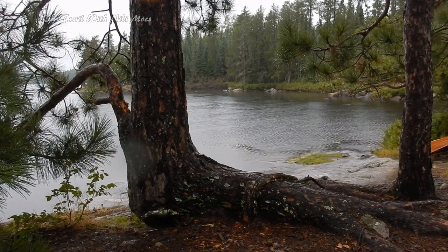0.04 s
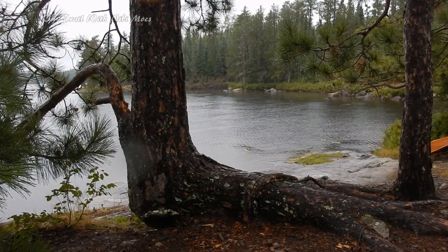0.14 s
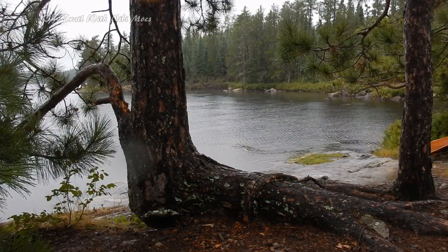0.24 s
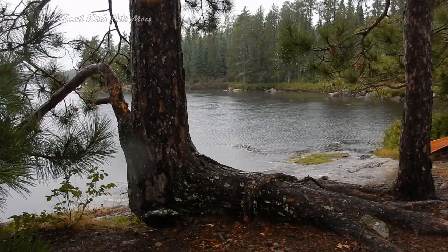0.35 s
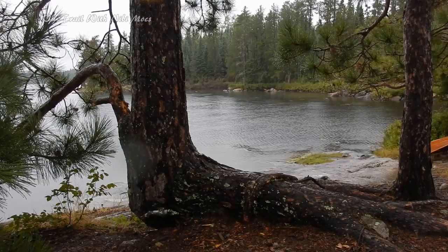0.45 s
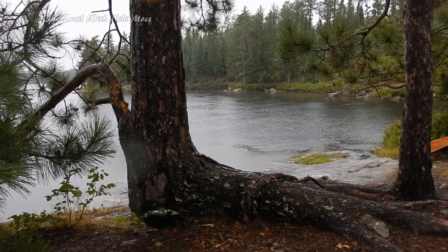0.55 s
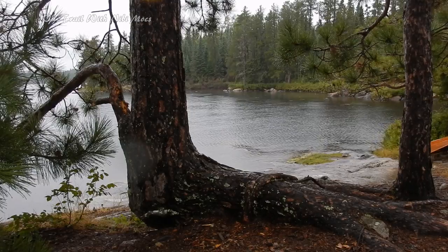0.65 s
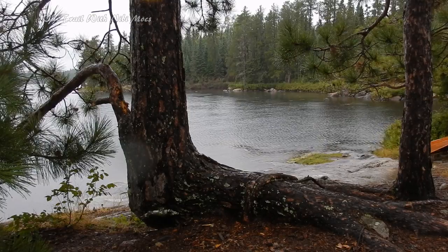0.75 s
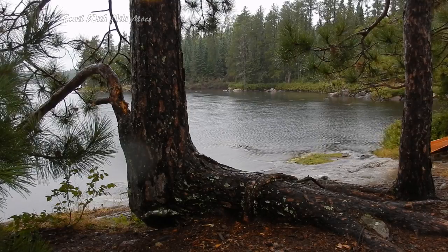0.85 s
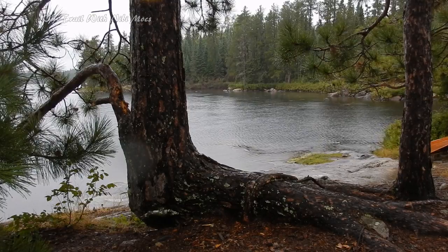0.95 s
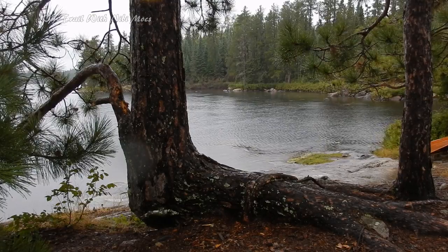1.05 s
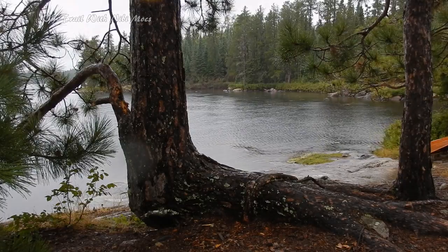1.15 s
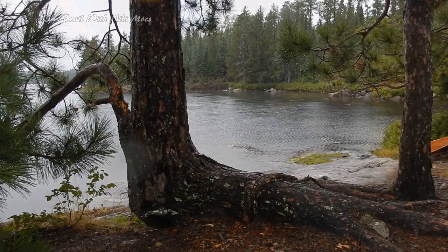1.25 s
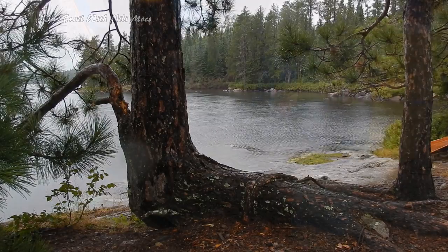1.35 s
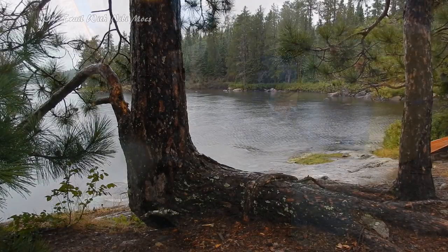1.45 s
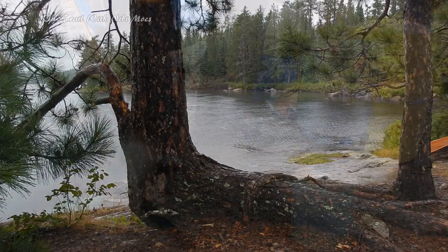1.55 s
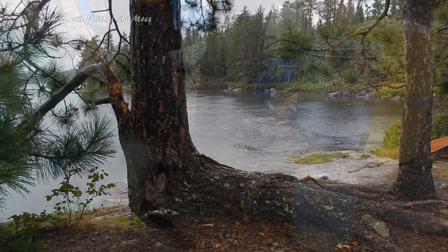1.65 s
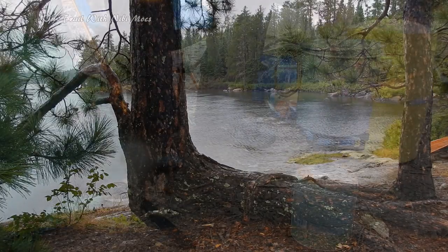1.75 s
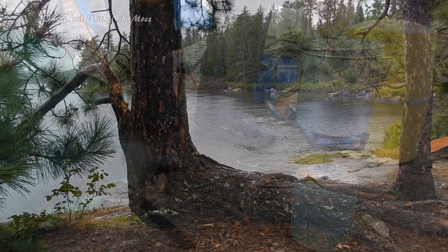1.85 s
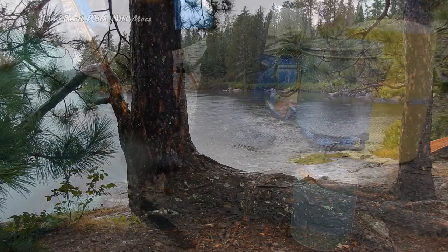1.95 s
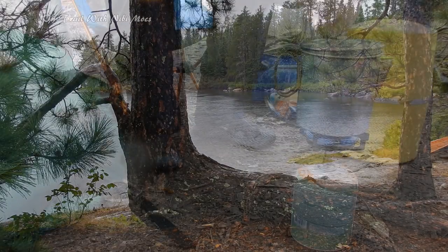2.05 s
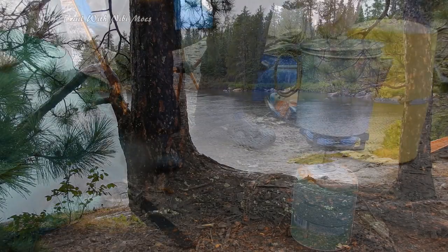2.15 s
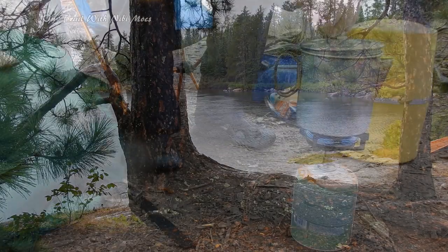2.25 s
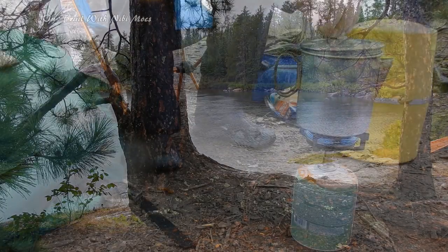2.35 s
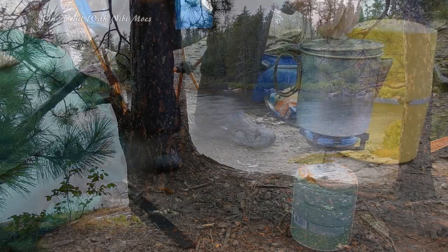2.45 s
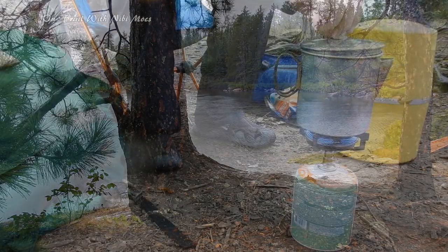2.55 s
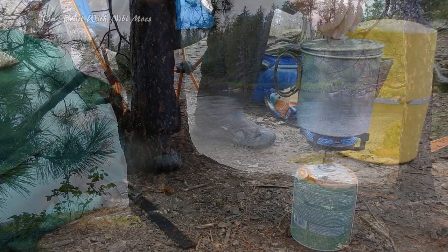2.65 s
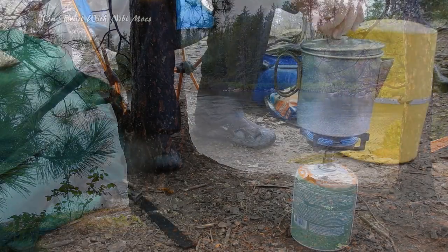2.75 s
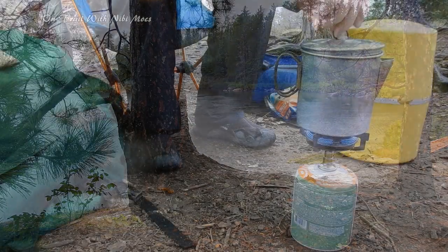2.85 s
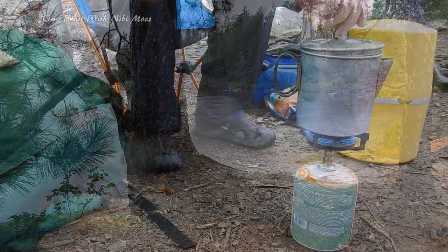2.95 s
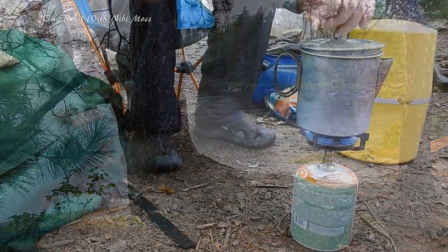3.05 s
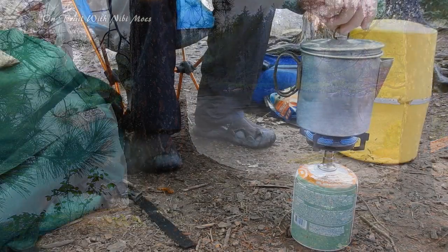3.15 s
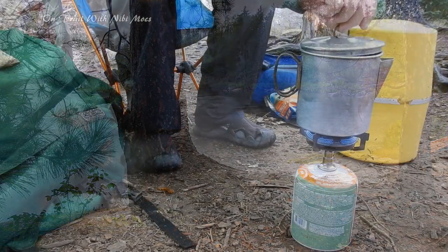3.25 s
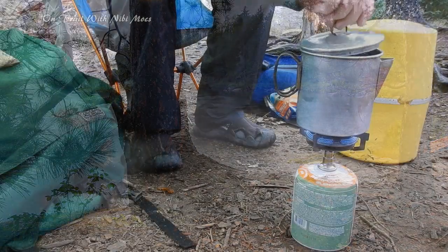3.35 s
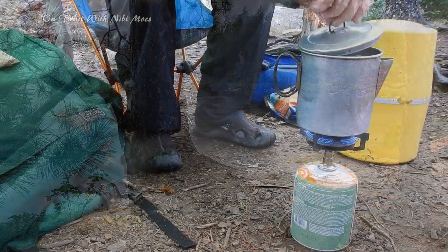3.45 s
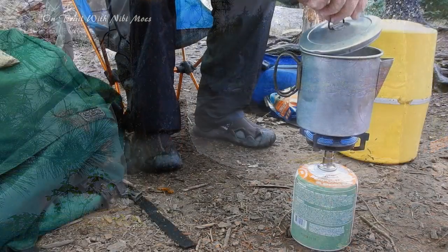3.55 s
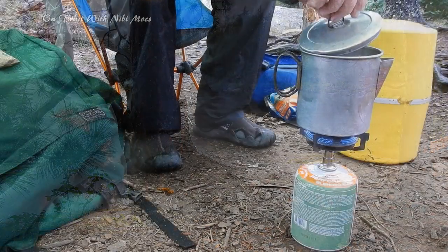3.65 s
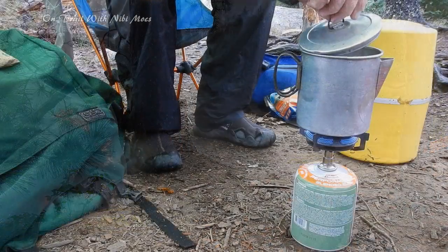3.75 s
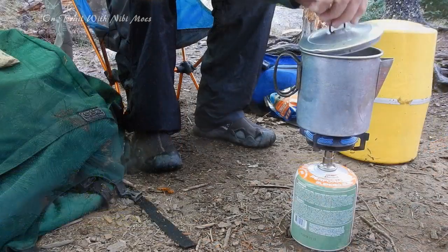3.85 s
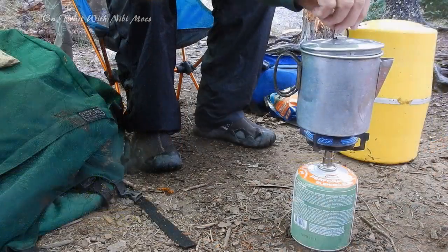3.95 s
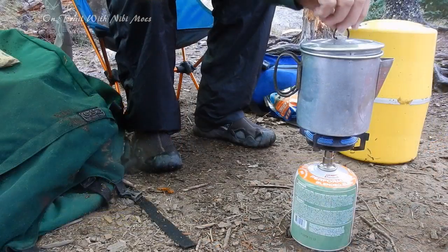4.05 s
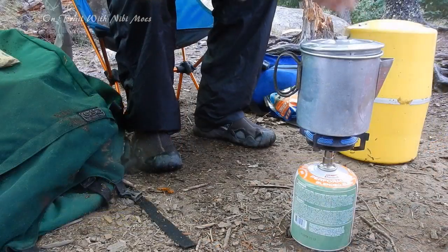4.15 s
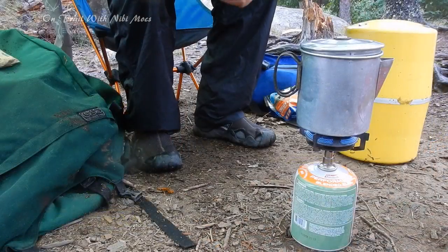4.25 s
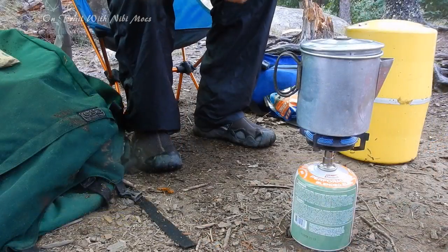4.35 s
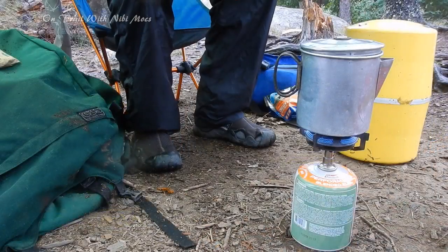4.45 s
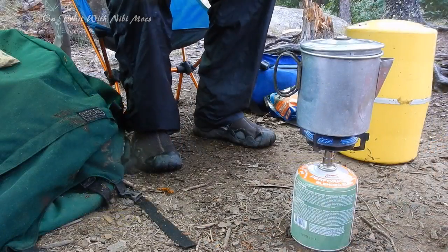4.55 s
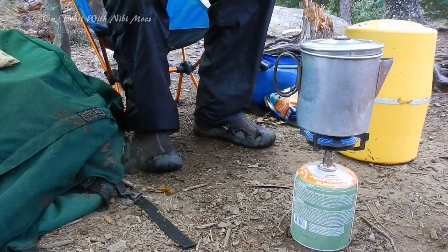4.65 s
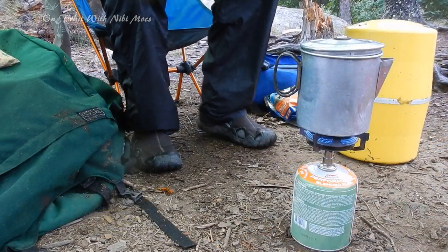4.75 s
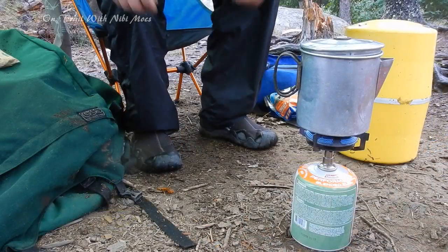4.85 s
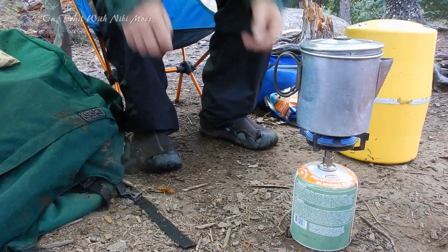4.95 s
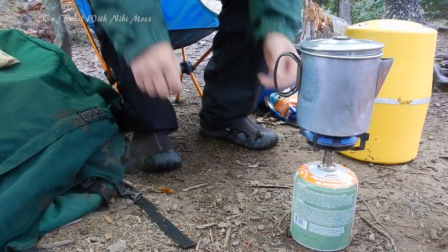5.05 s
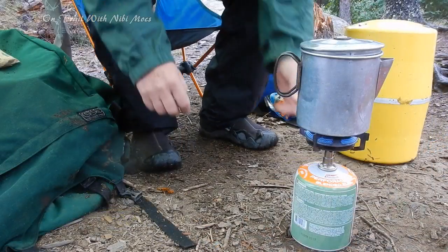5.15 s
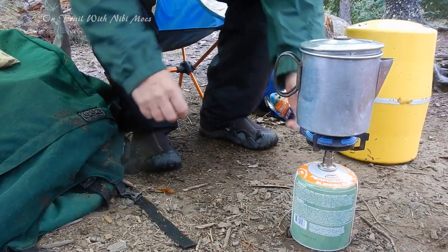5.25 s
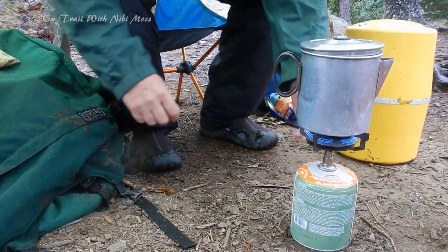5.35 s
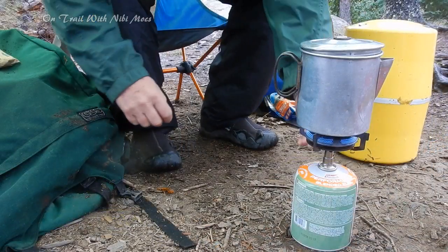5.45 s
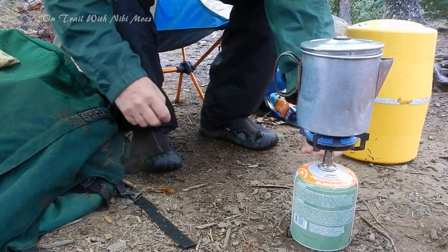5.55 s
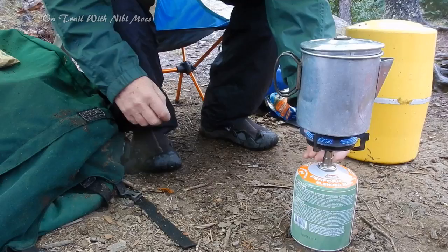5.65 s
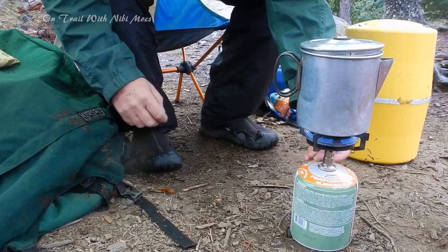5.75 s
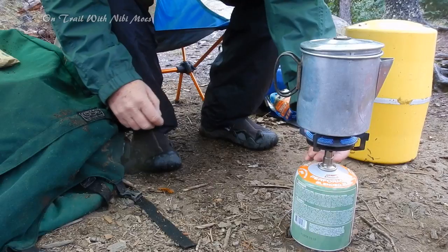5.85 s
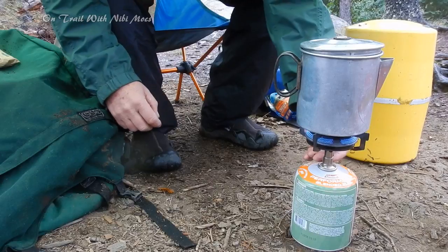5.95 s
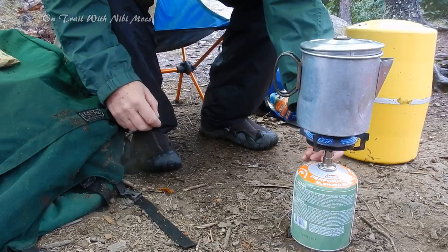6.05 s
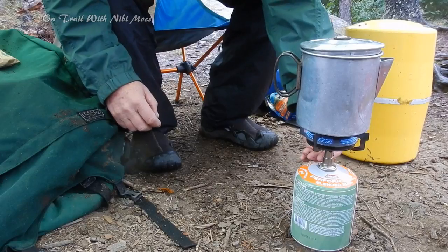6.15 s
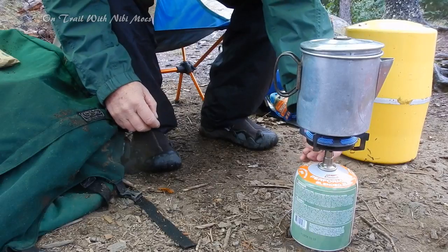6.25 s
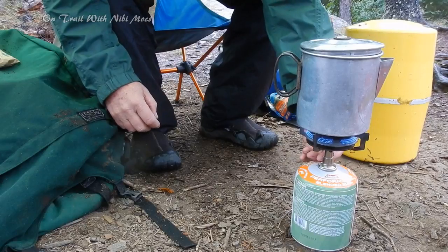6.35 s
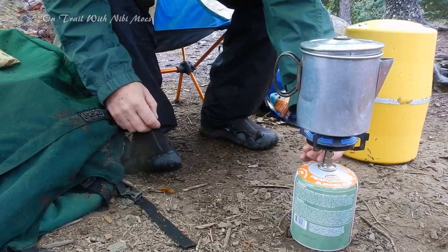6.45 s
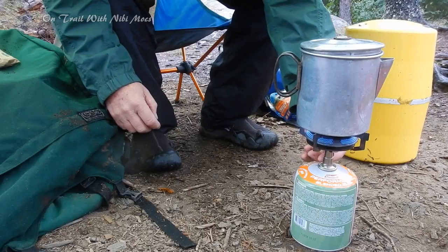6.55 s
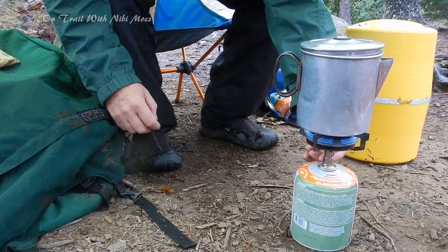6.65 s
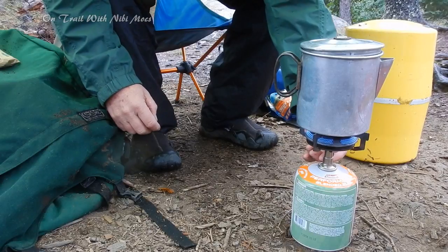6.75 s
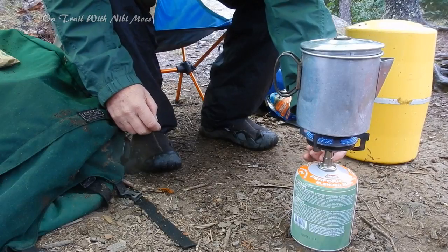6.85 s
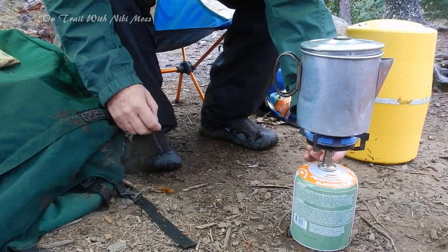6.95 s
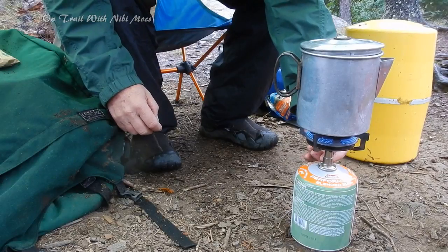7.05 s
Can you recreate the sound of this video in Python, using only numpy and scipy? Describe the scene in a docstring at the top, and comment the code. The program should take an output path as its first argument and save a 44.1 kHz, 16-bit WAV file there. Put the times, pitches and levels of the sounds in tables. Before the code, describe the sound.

Quiet lakeside drizzle cuts abruptly to a steadily roaring, hissing gas stove, with raindrops patting a tarp and a metal pot lid clinking.

```python
"""Light rain falls by a lake, with ticks on leaves and a few faint pats on a tarp.
After about a second comes a hard cut to a gas stove roaring under a pot, with more drops on the tarp.
A hand lifts the pot's lid, then slides it and sets it down; the last clink trips the gain control.
Later the treble swells, the valve squeaks and the flame sinks a little. Wind buffets throughout.
Filtered noise makes rain, burner and wind; fading sine tones make the ring of lid and cloth."""
import sys
import numpy as np
from scipy import signal
from scipy.fft import rfft, irfft, next_fast_len
from scipy.io import wavfile
from scipy.ndimage import uniform_filter1d, minimum_filter1d

SR = 44100
rng = np.random.default_rng(int(sys.argv[2]) if len(sys.argv) > 2 else 0)


def transcribe(u):
    """Save the signal u as a 16-bit wav file named by the first command-line argument.

    u: samples, shape (n,) or (channels, n), limited to [-1, 1]; the rate is SR.
    q: integer samples, one column per channel.
    """
    v = np.clip(np.atleast_2d(u).T, -1, 1)
    q = np.round(v * 32767).astype(np.int16)
    wavfile.write(sys.argv[1], SR, q)


N = 312733  # length in samples
CUT_S = 1.098  # the shore gives way to the stove here


def gain_of(db):
    """Turns decibels into a factor."""
    return 10 ** (np.asarray(db) / 20)


def evened(x):
    """Scales a sound to an rms (average strength) of 1."""
    return x / np.sqrt(np.mean(x ** 2) + 1e-20)


def read(points, hz):
    """Reads a table of frequencies and values, joined by straight lines over log frequency."""
    f, value = np.transpose(points)
    return np.interp(np.log(hz + 1), np.log(f + 1), value)


def add(mix, s, sound):
    """Lays a sound into the mix at s seconds."""
    part = mix[:, round(s * SR):][:, :sound.shape[1]]
    part += sound[:, :part.shape[1]]


def curve(rows):
    """Joins rows of seconds and values by straight lines, one value a sample."""
    s, value = np.transpose(rows)
    return np.interp(np.arange(N) / SR, s, value)


def sides(left_db):
    """Left and right gains that make the left louder by left_db."""
    return gain_of([[left_db / 2], [-left_db / 2]])


def fall(t, t60):
    """A fade that loses 60 dB in t60 seconds."""
    return gain_of(-60 * t / t60)


def coloured(x, points):
    """Minimum-phase filter: it shapes the spectrum but keeps the sharp front of a click."""
    log_gain = np.log(gain_of(read(points, abs(np.fft.fftfreq(2048, 1 / SR)))))
    spectrum = np.exp(log_gain - 1j * signal.hilbert(log_gain).imag)
    taps = np.fft.ifft(spectrum).real[:1024]
    taps = taps[None] / np.linalg.norm(taps)
    return signal.oaconvolve(x, taps, axes=1)[:, :x.shape[1]]


# How the two microphone ports differ for wide sounds.
# Each row: frequency in Hz, likeness of the two sides (1 is the same).
PORT_LIKENESS = [(60, 0.25), (110, 1), (200, 0.98), (380, 0.99), (700, 0.97), (1290, 0.9), (2380, 0.86),
                 (4400, 0.8), (8120, 0.75), (15000, 0.61)]
# Each row: frequency in Hz, left over right in dB.
PORT_LEFT_DB = [(60, -1), (110, -0.5), (200, -1), (380, -0.5), (700, -2.5), (1290, -1.5), (2380, -2),
                (4400, -2.5), (8120, 3.5), (15000, 3)]
# Each row: frequency in Hz, how far the left is ahead of the right in radians.
PORT_LEAD = [(0, -0.44), (2760, 0.31), (4570, 0.59), (5170, 1.15), (6120, 0.29), (7240, 1.7), (7580, 0.98),
             (8010, 0.64), (8790, 0.038), (9820, -0.52), (10600, -0.36), (11600, 0.3), (12400, 0.0),
             (16000, 0.1)]


def noise(points, patchy_db, flutter_db, stretch=None, size=512, count=N):
    """Two-sided noise from random short spectra, with drifting patches and a shared flutter of level."""
    hop = size // 3
    frames, hz = count // hop + 5, np.fft.rfftfreq(size, 1 / SR)
    a, b, c, d, patches = rng.standard_normal((frames, len(hz), 5), dtype=np.float32).T
    patches = evened(uniform_filter1d(uniform_filter1d(patches, size=5, axis=0), size=12, axis=1))
    flutter = evened(uniform_filter1d(rng.standard_normal(frames), size=5))
    # stretch slides the whole spectrum up or down in pitch
    shift = 1 if stretch is None else stretch[np.minimum(np.arange(frames) * hop, N - 1)]

    same = np.clip(read(PORT_LIKENESS, hz), -1, 1)[:, None]
    left = a + 1j * b
    right = same * left + np.sqrt(1 - same ** 2) * (c + 1j * d)
    right = right * np.exp(-1j * read(PORT_LEAD, hz))[:, None]
    port_gains = gain_of(np.outer([.5, -.5], read(PORT_LEFT_DB, hz)))[:, :, None]
    level_db = read(points, hz[:, None] / shift) + patchy_db * patches + flutter_db * flutter
    spectra = np.array([left, right]) * port_gains * gain_of(level_db)
    sound = evened(signal.istft(spectra, nperseg=size, noverlap=size - hop)[1][:, :count])
    return np.pad(sound, ((0, 0), (0, N - count)))


# Colours of the flame's rumble, the gas jet's hiss and the fizz above it.
# Each row: frequency in Hz, relative level in dB per Hz.
FLAME_COLOUR = [(35, -52), (60, -12.5), (173, 1.5), (256, -5), (597, -10.5), (725, -18.5), (806, -23),
                (1150, -17), (1320, -21), (1610, -16.5), (2170, -17.5), (2500, -27), (3320, -15),
                (3750, -28.5), (4100, -28.5), (5330, -66), (9020, -120)]
JET_COLOUR = [(2290, -55), (3900, -36), (4320, -20.5), (4680, -8.5), (5020, -7), (5460, -3.5), (5850, 3),
              (6070, 0), (6720, -9), (7270, -29.5), (8000, -41.5), (10400, -63), (17600, -120)]
FIZZ_COLOUR = [(4120, -27), (7000, 1), (7280, -8), (7730, -12), (8470, -9), (9320, -15), (10400, -11),
               (11000, -24.5), (11700, -53), (14700, -35), (16300, -48)]
FLAME_DB, JET_DB, FIZZ_DB = -35.5, -36.5, -55.5  # before the changes below
TURN_DOWN_S, TURN_DOWN_DB_PER_S = 6.23, -2  # the valve is slowly closed a little from here
JET_WARMS_DB_PER_S = 0.31  # the jet grows slightly as the stove runs
JET_TABLE_HZ = 5900  # the pitch at which the jet's colour is drawn
JET_PITCH_HZ, JET_WANDER = 5857, 0.002  # the pitch wanders by this share (rms)
SWELL_S, SWELL_WIDTH_S, SWELL_DB = 5.41, 0.17, 5  # the treble swells once
SWELL_JET_SHARE = 0.42  # the jet takes this share of the swell


def stove():
    """The flame rumbles under the pot, the gas jet hisses round one pitch and fizzes above it."""
    t = np.arange(N) / SR
    closing_db = TURN_DOWN_DB_PER_S * np.maximum(t - TURN_DOWN_S, 0)
    swell_db = SWELL_DB * np.exp(-((t - SWELL_S) / SWELL_WIDTH_S) ** 2)
    rates_hz = np.geomspace(.5, 6, num=8)
    wander = evened(sum(np.sin(2 * np.pi * (f * t + rng.random())) for f in rates_hz))
    jet_hz = JET_PITCH_HZ * (1 + JET_WANDER * wander)
    warming_db = JET_WARMS_DB_PER_S * (t - N / SR / 2)  # zero halfway through
    jet_db = JET_DB + warming_db + closing_db + SWELL_JET_SHARE * swell_db
    flame = gain_of(FLAME_DB + closing_db) * noise(FLAME_COLOUR, 0.99, 0.98, size=1024)
    jet = gain_of(jet_db) * noise(JET_COLOUR, 1.17, 0.82, stretch=jet_hz / JET_TABLE_HZ)
    fizz = gain_of(FIZZ_DB + closing_db + swell_db) * noise(FIZZ_COLOUR, 1.0, 0.53)
    return flame + jet + fizz + squeak()


SQUEAK_START_S, SQUEAK_END_S, SQUEAK_DB = 5.535, 5.63, -34.5  # level before the fade in and out
SQUEAK_FIRST_HZ, SQUEAK_LAST_HZ, SQUEAK_WIDTH_HZ = 6603, 6150, 706


def squeak():
    """Gas whistles briefly through the turning valve: a narrow band of noise that slides down."""
    n, out = round((SQUEAK_END_S - SQUEAK_START_S) * SR), np.zeros((2, N))
    low_pass = signal.butter(N=4, Wn=SQUEAK_WIDTH_HZ / SR, output="sos")
    slow = signal.sosfilt(low_pass, rng.standard_normal((2, n)).T @ [1, 1j])
    pitch_hz = np.linspace(SQUEAK_FIRST_HZ, SQUEAK_LAST_HZ, n)
    tone = (slow * np.exp(2j * np.pi * np.cumsum(pitch_hz) / SR)).real
    add(out, SQUEAK_START_S, gain_of(SQUEAK_DB) * evened(tone) * np.hanning(n) * np.ones((2, 1)))
    return out


# The tones (modes) in which the lid rings when nothing damps it.
# Each row: pitch in Hz, level in dB, seconds to fade by 60 dB, share that belongs to the rim (0 to 1).
LID_MODES = [(626, -20, 0.033, 0.92), (827, -10.5, 0.044, 0.34), (972, -0.5, 0.021, 0.12),
             (1167, -3, 0.034, 0.14), (1320, -2.5, 0.022, 0.27), (1460, -24, 0.25, 0),
             (1540, -10, 0.061, 0.26), (1930, -13.5, 0.12, 0), (2082, -3, 0.031, 0), (2844, -16.5, 0.27, 0),
             (3470, -13, 0.034, 0.23), (4290, -12.5, 0.1, 0), (4320, -9, 0.09, 0.54),
             (4358, -6.5, 0.06, 0.59), (4823, -0.5, 0.058, 0.0062), (4865, -25, 0.084, 0.44),
             (4950, -3, 0.045, 0), (5110, -11, 0.17, 0.21), (5140, -2.5, 0.095, 0), (5460, -13, .03, 0.42),
             (5350, -11, 0.11, 0.54), (5900, -7, 0.084, 0.47), (6750, -9, 0.034, 0.26),
             (7300, -33, .05, 0.38), (7740, -13, 0.081, 1), (8300, -30, .04, 0), (9400, -28.5, 0.084, 0.97),
             (10200, -40, .04, 0)]
RIM_LEFT_DB = 7  # a pure rim tone is this much louder on the left


def lid_modes():
    """The metal lid's fading sine tones, returned with their pitches and rim shares."""
    t = np.arange(SR // 4) / SR
    hz, db, t60, rim = np.transpose(LID_MODES)[:, :, None]
    # the phase difference between the ports, as a delay of the right one
    lag = np.array([0, 1])[:, None, None] * read(PORT_LEAD, hz) / (2 * np.pi * hz)
    modes = gain_of(db) * fall(t, t60) * np.sin(2 * np.pi * hz * (t - lag))
    modes = modes * np.minimum(t / 0.00024, 1)  # soft start
    return hz, rim, modes * gain_of(RIM_LEFT_DB * rim * [[[.5]], [[-.5]]])


# Blows on the lid.
# Each row: start in seconds, strength in dB, hardness in dB per octave (more favours high tones),
# rattle fade time in seconds, extra rim level in dB, clatter level in dB against the strength,
# seconds in which the gripping fingers alone would fade the ring by 60 dB.
LID_BLOWS = [(3.4569, -15, -0.5, 0.0057, 3.5, -11, 0.072), (3.4655, -21, -0.5, 0.012, 2, -2.5, 0.065),
             (3.503, -31, -4.5, .003, -8, -9, 0.043), (4.0248, -16.5, -1, 0.0067, 17.5, 1, 0.29),
             (4.035, -18.5, 5.5, 0.0049, 5, -9, 0.22), (4.2537, -2.5, 7.5, 0.0036, -21, -6.5, 3.1)]
# Colour of the clatter. Each row: frequency in Hz, relative level in dB.
CLATTER_COLOUR = [(200, -19), (500, -5.5), (1500, 6), (3300, -9.5), (5000, -1.5), (7000, -17),
                  (10500, -28.5), (12000, -54), (14500, -49), (16500, -60)]


def lid_blows():
    """Each blow is a short rattle of contacts that rings the modes, with a burst of clatter."""
    out, t = np.zeros((2, N)), np.arange(SR // 4) / SR
    hz, rim, modes = lid_modes()
    signs = (-1) ** np.arange(len(LID_MODES))[:, None]
    for s, strength_db, hardness_db, rattle_s, rim_db, clatter_db, grip_t60 in LID_BLOWS:
        contacts = rng.standard_normal(2000) * (rng.random(2000) < .01)
        contacts = contacts * np.exp(-t[:2000] / rattle_s) * .5
        contacts[0] = 1
        contacts = contacts / np.linalg.norm(contacts)
        contacts = np.convolve(contacts, np.hanning(7) / 3)  # a contact lasts a moment
        share = signs * gain_of(hardness_db * np.log2(hz / 3000) + rim * rim_db)
        body = (share * modes).sum(1) * fall(t, grip_t60)
        add(out, s, gain_of(strength_db) * signal.oaconvolve(body, contacts[None], axes=1))

        loose = rng.standard_normal((3, len(t)))  # countless small modes blur into a short noise
        loose = loose[0] + 0.37 * loose[1:]
        loose = loose * (fall(t, 0.0072) + 0.61 * fall(t, 0.069 + 2 * rattle_s))
        tilted = [(f, level_db + hardness_db * np.log2(f / 3000)) for f, level_db in CLATTER_COLOUR]
        add(out, s, gain_of(strength_db + clatter_db) * coloured(loose, tilted))
    return out


SCRAPE_START_S, SCRAPE_END_S, SCRAPE_DB = 3.96, 4.025, -61.5


def lid_scrape():
    """The lid slides to its seat: growing random slips ring its modes, mostly those of the rim."""
    out = np.zeros((2, N))
    hz, rim, modes = lid_modes()
    n = round((SCRAPE_END_S - SCRAPE_START_S) * SR)
    slips = np.convolve(rng.standard_normal(n) * np.linspace(0, 1, n), np.hanning(9) / 3)
    share_db = 20.0 * rim - 5.1 * abs(np.log2(hz / 1400)) - 2.0 * np.log2(hz / 3000)
    slide = (gain_of(share_db) * modes).sum(1)
    add(out, SCRAPE_START_S, gain_of(SCRAPE_DB) * signal.oaconvolve(slide, slips[None], axes=1))
    return out


# Drops on the tarp; DELAY_S is added to each time.
# Each row: time in seconds, level in dB, pitch of the cloth in Hz, splash against the pat in dB.
TARP_DROPS = [(0.22, -34.5, 514, -5.5), (0.279, -32.5, 566, -8), (0.322, -35.5, 953, -8),
              (1.364, -26, 414, -3.5), (1.565, -19, 501, -7), (1.659, -12, 416, -5.5),
              (1.716, -19.5, 991, -6), (1.869, -27.5, 576, -2), (1.995, -17, 554, -5),
              (2.01, -22.5, 653, -2.5), (2.1, -20, 450, -3.5), (2.13, -22.5, 1080, -4),
              (2.201, -17.5, 525, -3.5), (2.256, -22, 986, -6), (2.842, -18.5, 480, -6),
              (2.868, -17.5, 470, -3), (2.908, -25, 452, -3.5), (2.991, -24, 490, -3.5),
              (3.167, -21, 367, -3), (3.332, -15, 580, -7), (3.559, -22, 424, -1.5),
              (3.859, -26, 480, -3.5), (4.602, -32.5, 444, 1), (4.668, -27, 514, -4), (4.68, -33, 487, 3),
              (4.942, -24, 641, -5), (5.344, -27.5, 586, 2.5), (5.597, -24, 400, -3),
              (5.831, -26.5, 552, -3.5), (6.062, -25, 390, -5), (6.31, -18.5, 493, -4.5),
              (6.35, -22, 410, -4.5), (6.404, -15.5, 423, -4.5), (6.466, -27.5, 395, -4),
              (6.69, -19.5, 623, -6.5), (6.725, -26.5, 401, -3), (6.899, -26, 436, -5),
              (7.013, -26.5, 390, -5.5)]
# Tones of the taut cloth. Each row: multiple of its pitch, level in dB, share of the fade time.
CLOTH_TONES = [(1, -1.3, 0.95), (1.6, -10, 0.33), (2.3, -11.5, 0.67), (3.6, -20, 0.3)]
# Colour of the splashes. Each row: frequency in Hz, relative level in dB.
SPLASH_COLOUR = [(200, -24.5), (600, 5), (2000, 2.5), (4000, -10), (5500, 4), (7000, -16.5), (10500, -39.5),
                 (12000, -58), (16000, -45)]
TARP_T60 = 0.022  # seconds for the cloth to fade by 60 dB
TARP_LEFT_DB, TARP_SPREAD_DB = -.6, 1.1  # drops land all over the cloth: mean and spread of the side
SNAP_DB, SNAP_S = -0.5, 0.00024  # the first contact of a drop, against its splash
DELAY_S = .0018  # pat, snap and splash all start this long after the time in the table
PATTER_DB, PATTER_PER_S = -53, 70  # small drops; level before the splash colour


def tarp():
    """Each drop thumps the taut cloth and splashes; many small ones patter at random."""
    pats, splashes, t = np.zeros((2, N)), np.zeros((2, N)), np.arange(2600) / SR
    fade = fall(t, TARP_T60) * np.minimum(t / 0.00063, 1)
    splash_fade = fade ** 0.64 + 0.27 * fade ** 21.0  # a slow part and a quick one
    for s, db, hz, splash_db in TARP_DROPS:
        s += DELAY_S
        left_db = TARP_LEFT_DB + TARP_SPREAD_DB * rng.standard_normal()
        level = gain_of(db) * sides(left_db)
        thump = sum(gain_of(part_db) * np.sin(2 * np.pi * k * hz * t) * fade ** (1 / share)
                    for k, part_db, share in CLOTH_TONES)
        add(pats, s, -level * thump)
        add(splashes, s, level * gain_of(splash_db + SNAP_DB) * -np.exp(-t / SNAP_S))
        spray = rng.standard_normal((3, 2600))
        spray = spray[0] + 0.26 * spray[1:]
        add(splashes, s, level * gain_of(splash_db) * spray * splash_fade)

    small = gain_of(5.8 * np.minimum(rng.exponential(1, N), 2.8)) * (rng.random(N) < PATTER_PER_S / SR)
    patter = signal.oaconvolve(small, fall(t, 0.017))[:N] * rng.standard_normal(N)
    patter = gain_of(PATTER_DB) * evened(patter) * (np.arange(N) > CUT_S * SR)
    return pats + coloured(splashes + patter, SPLASH_COLOUR)


# How loud the far rain is on the shore. Each row: time in seconds, level in dB.
RAIN_LEVEL = [(0, -51.5), (.3, -46.5), (.65, -50), (1.1, -51)]
# Colour of the rain. Each row: frequency in Hz, relative level in dB per Hz.
RAIN_COLOUR = [(53, -41), (90, 0.5), (290, -6), (376, -13), (488, -6.5), (647, -11), (1790, -12),
               (2480, -19), (2830, -19), (3830, -27), (5300, -17), (7170, -28), (8350, -40.5), (14700, -53),
               (16000, -57)]
DRIZZLE_DB, DRIZZLE_PER_S = -5.5, 170  # small near drops: level against the far rain


def shore_rain():
    """Fine rain: a steady far noise, and near drops as brief bursts of the same colour."""
    count, t = round(1.2 * SR), np.arange(500) / SR
    far = noise(RAIN_COLOUR, 1.1, 0.95, count=count)
    sizes = gain_of(5.4 * np.minimum(rng.exponential(1, count), 3))
    sizes = sizes * (rng.random(count) < DRIZZLE_PER_S / SR)
    spray = rng.standard_normal((3, count))
    near = (spray[0] + 0.81 * spray[1:]) * signal.oaconvolve(sizes, fall(t, 0.018))[:count]
    near = np.pad(evened(coloured(near, RAIN_COLOUR)), ((0, 0), (0, N - count)))
    return gain_of(curve(RAIN_LEVEL)) * (far + gain_of(DRIZZLE_DB) * near)


# Drops ticking on leaves by the shore.
# Each row: start in seconds, level in dB before the leaf colour, left over right in dB.
LEAF_TICKS = [(.125, -36.5, -12), (0.137, -36.5, 2), (0.2207, -38, -5), (.5062, -45, -8),
              (0.554, -33.5, -1.5), (.6848, -49.5, -.6), (.7961, -53, -1.5), (.861, -45.5, -7),
              (0.9233, -37.5, 8)]
# Colour of the leaves. Each row: frequency in Hz, relative level in dB.
LEAF_COLOUR = [(1000, -28), (4000, -6), (5500, 3), (7500, 0), (10500, -25), (12000, -40), (16500, -46)]
TICK_HZ = 5340


def leaf_ticks():
    """A drop on a leaf gives a very short tone and a slightly longer spray of noise."""
    ticks, t = np.zeros((2, N)), np.arange(500) / SR
    for s, db, left_db in LEAF_TICKS:
        tone = np.sin(2 * np.pi * TICK_HZ * t) * fall(t, 0.0017)
        spray = 0.43 * rng.standard_normal((2, 500)) * fall(t, 0.013)
        add(ticks, s, gain_of(db) * sides(left_db) * (tone + spray))
    return coloured(ticks, LEAF_COLOUR)


# Strength of the wind on the microphone. Each row: time in seconds, level in dB.
WIND_GUSTS = [(0, -53), (.32, -71), (.39, -36), (.56, -65), (.9, -50), (1.08, -70), (1.11, -26.5),
              (1.3, -36.5), (1.52, -32.5), (1.8, -42), (1.95, -35.5), (2.3, -59), (3.75, -60),
              (4.12, -43.5), (5.28, -60), (5.41, -35.5), (5.5, -50), (5.95, -45), (6.5, -60), (7.09, -44)]
# Colour of the wind. Each row: frequency in Hz, relative level in dB per Hz.
WIND_COLOUR = [(10, -1), (30, -11), (65, -4.5), (100, -5.5), (160, -12.5), (400, -77)]
WIND_SAME, WIND_LEFT_DB = 0.55, -12.5  # shared part against each port's own; the right gets more


def wind():
    """Lumpy low pressure on the microphone, worked out coarsely and then filled in."""
    n = next_fast_len(N // 32 + 1)  # one coarse point for every 32 samples
    t = np.arange(n) * 32 / SR
    rates_hz = np.geomspace(2, 14, num=12)
    lumps = sum(np.sin(2 * np.pi * (f * t + rng.random((2, 1)))) / np.sqrt(f) for f in rates_hz)
    air = rng.standard_normal((3, n))
    air = (WIND_SAME * air[0] + air[1:]) * gain_of(3.4 * evened(lumps)) * sides(WIND_LEFT_DB)
    spectrum = rfft(air) * gain_of(read(WIND_COLOUR, np.fft.rfftfreq(n, 32 / SR)))
    return gain_of(curve(WIND_GUSTS)) * evened(irfft(spectrum, 32 * n)[:, :N])


def scene():
    """The shore, a hard cut, then the stove; tarp, lid and wind lie over both."""
    after = np.clip((np.arange(N) / SR - CUT_S) / 0.00055, 0, 1)
    shore = shore_rain() + leaf_ticks()
    return after * stove() + lid_blows() + lid_scrape() + tarp() + (1 - after) * shore + wind()


NOTCH_HZ, NOTCH_WIDTH_HZ = 2483, 100  # a dip of the microphone housing
LIMIT_DB, RECOVERY_DB_PER_S, HOLD_S = -9.5, 21, 0.038
FAST_SHARE, LATE_SHARE, LATE_S = 0.76, 0.42, 0.073  # parts of the gain cut; the late one comes slowly
EDGE_HZ = 16400  # top of the band


def record(dry):
    """Housing notch, gain control that falls quickly on a loud peak and climbs back slowly, band limit."""
    heard = signal.lfilter(*signal.iirnotch(NOTCH_HZ, NOTCH_HZ / NOTCH_WIDTH_HZ, SR), dry)
    power = abs(uniform_filter1d((heard ** 2).max(0), size=60))
    power_db = 10 * np.log10(power * 2 + 1e-12)
    hold = 2 * round(HOLD_S * SR / 2) + 1
    held_db = -minimum_filter1d(-power_db, hold, origin=hold // 2)  # loudest moment of the recent past
    climb = np.arange(N) * RECOVERY_DB_PER_S / SR
    envelope_db = np.maximum.accumulate(held_db + climb) - climb  # sinks at the recovery rate
    over_db = np.maximum(envelope_db - LIMIT_DB, 0)
    pole = np.exp(-1 / (LATE_S * SR))
    late_db = signal.lfilter([1 - pole], [1, -pole], over_db)
    cut_db = FAST_SHARE * uniform_filter1d(over_db, size=40) + LATE_SHARE * late_db
    ducked = heard / gain_of(cut_db)
    low_pass = signal.firwin(511, EDGE_HZ, window=("kaiser", 9), fs=SR)
    return signal.oaconvolve(ducked, low_pass[None], "same")


dry = scene()
out = record(dry)
transcribe(out)
```